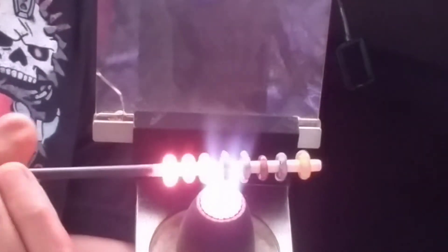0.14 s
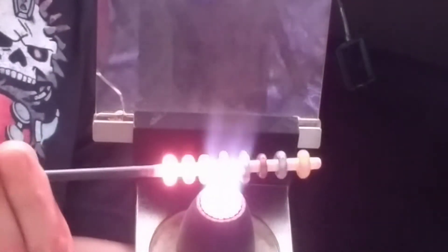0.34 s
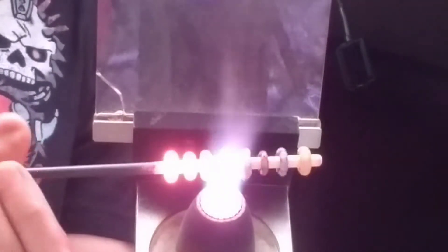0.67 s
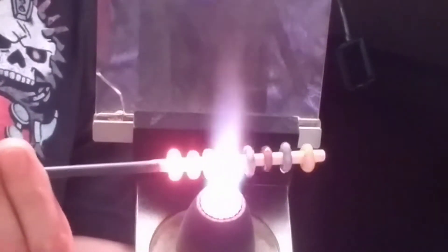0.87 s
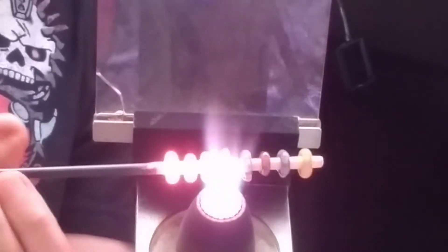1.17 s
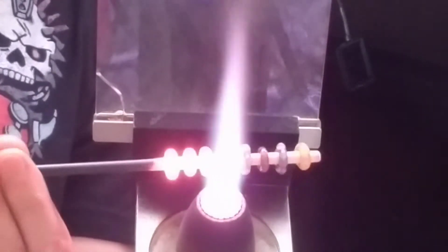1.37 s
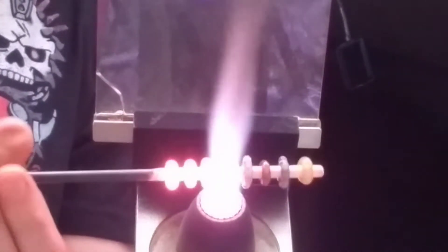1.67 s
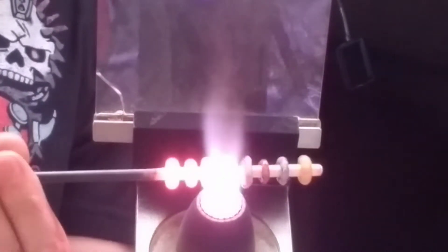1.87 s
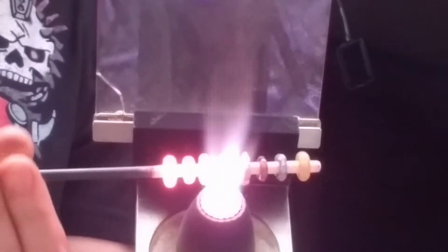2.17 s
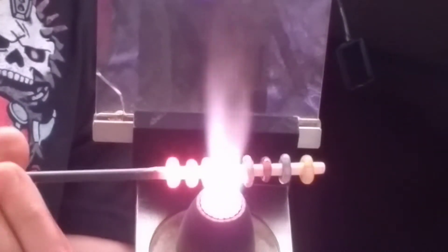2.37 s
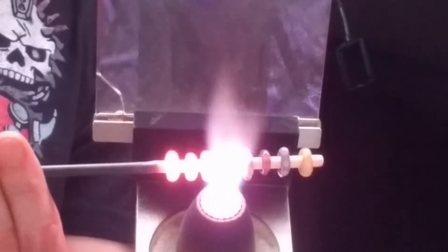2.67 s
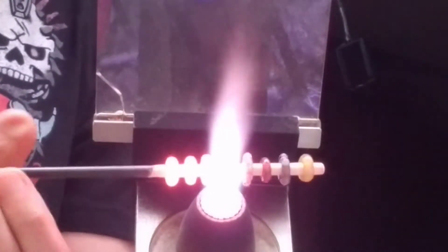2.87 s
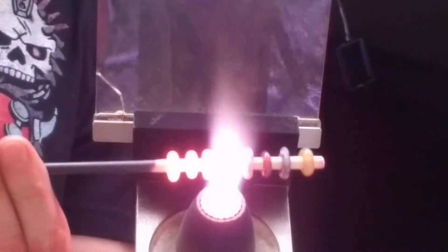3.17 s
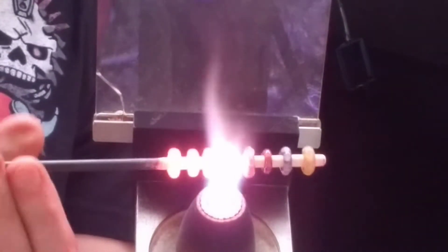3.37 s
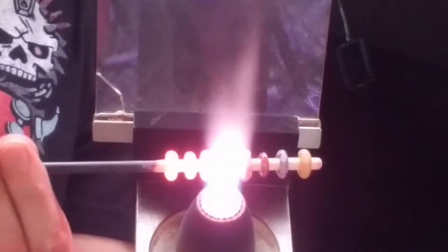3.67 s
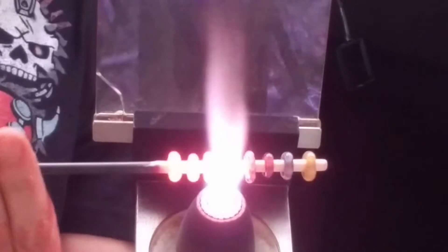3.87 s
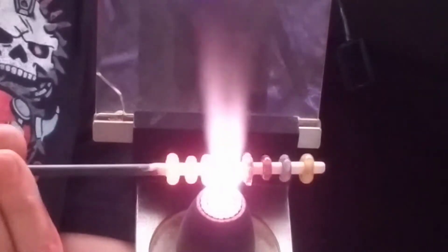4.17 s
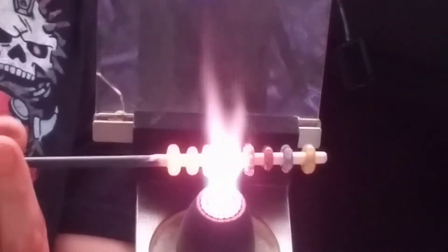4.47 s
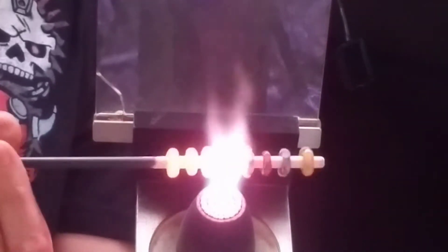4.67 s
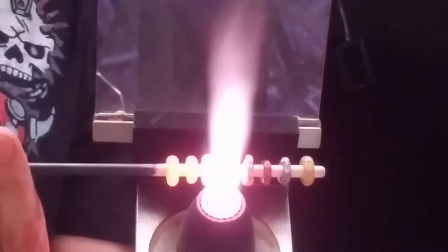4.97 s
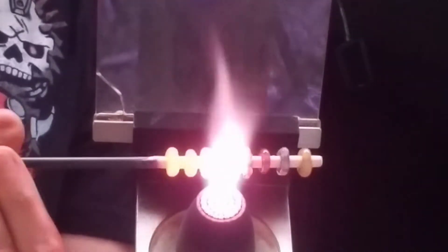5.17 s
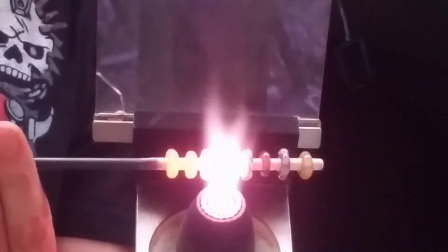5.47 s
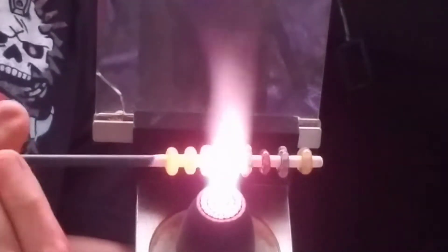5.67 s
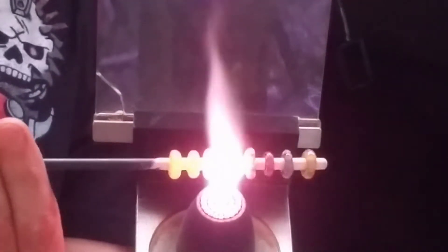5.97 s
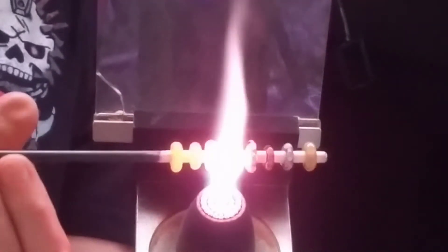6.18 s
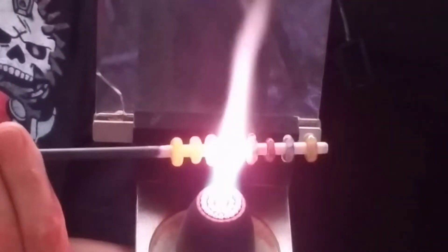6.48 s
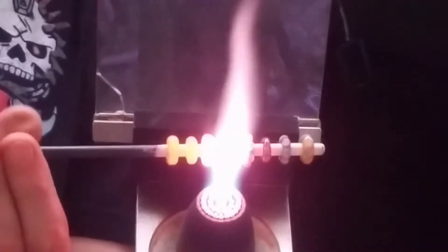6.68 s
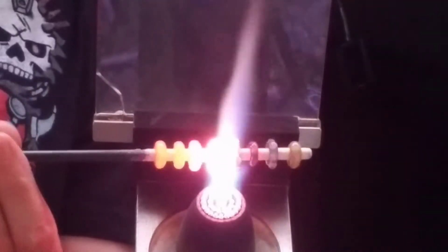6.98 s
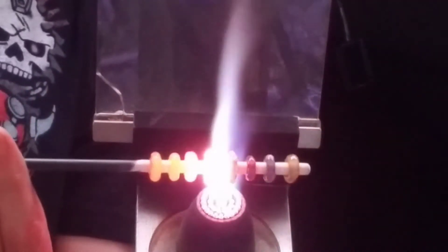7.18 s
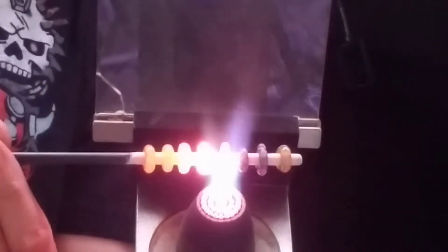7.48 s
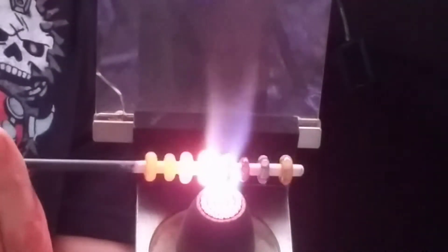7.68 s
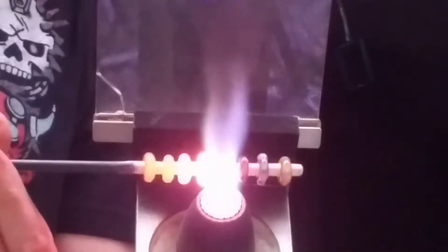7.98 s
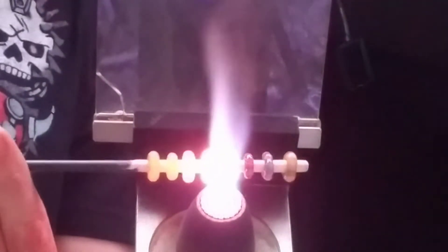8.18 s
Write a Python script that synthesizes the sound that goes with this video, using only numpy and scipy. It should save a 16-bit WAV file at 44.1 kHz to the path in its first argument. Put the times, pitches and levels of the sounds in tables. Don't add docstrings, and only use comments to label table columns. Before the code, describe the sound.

Throughout about 8.3 seconds, a gas torch on a workshop bench burns with a low, steady rush, blended with air moving through an extractor duct. Beneath it the fan and motor hold a deep hum, strongest near 147 Hz, wavering only slightly. A thin, fluttering jet hiss sits very high, around 13 to 15 kHz; it is briefly stronger at the very start, then settles, and surges a little at 5.2 seconds before easing by 5.5. A belt chirps about every 0.6 seconds, from 0.28 to 8.07: short, upward-gliding squeaks near 1.9 kHz with a quick echo, clearest at 0.3, 2.1, 2.7 and 8.1, weak around 1.5, 4.5 and 7.5. Fainter, higher metallic ticks accompany some. Close small microphone, faint electronic hiss; one side carries nearly everything, the other a dull, quiet copy.

```python
import sys
import numpy as np
from scipy import signal
from scipy.fft import rfft, irfft
from scipy.io import wavfile
from scipy.ndimage import uniform_filter1d

SR = 44100
rng = np.random.default_rng(int(sys.argv[2]) if len(sys.argv) > 2 else 0)


def voltage_ratio(decibels):
    exponent = np.asarray(decibels, float) / 20
    return 10 ** exponent


def bounce(signal):
    frames = np.transpose(np.atleast_2d(signal))
    limited = np.clip(frames, -1, 1)
    pcm = np.round(limited * 32767).astype(np.int16)
    wavfile.write(sys.argv[1], SR, pcm)


N = 367794


def read(points, hz, order=1):
    table = np.transpose(points)
    return np.interp(np.log(hz + 1), np.log(table[0] + 1), table[order])


def humps(modes, hz):
    return sum(voltage_ratio(db) ** 2 / (1 + (2 * (hz - f) / width) ** 2) ** 2 for f, width, db in modes)


def drift(shape, frames, bins):
    z = rng.standard_normal(shape)
    for _ in range(2):
        z = uniform_filter1d(z, max(int(frames), 1), -1)
        z = uniform_filter1d(z, max(int(bins), 1), 0)
    return z / z.std()


def noise(power, size, level_db=None, patchy_db=0., frames=8, bins=8, flicker_db=0.):
    overlap = size * 3 // 4
    hz, t, z = signal.stft(rng.standard_normal(N), SR, nperseg=size, noverlap=overlap)
    field_db = patchy_db * drift(z.shape, frames, bins)
    field_db = field_db + flicker_db * drift((1, len(t)), frames, 1)
    if level_db is not None:
        field_db = field_db + np.interp(t, *level_db)
    z = z * np.sqrt(power(hz) * SR / 2)[:, None] * voltage_ratio(field_db)
    return signal.istft(z, SR, nperseg=size, noverlap=overlap)[1][:N]


# f/Hz, level/dB rms, level wander/dB
HUM_TONES = [(58.1, -48, 0), (97.15, -41, 1), (119.9, -41, 2.5), (146.93, -32, 0.45), (296, -57.5, -1.5),
             (720, -66.5, 3)]


def hum():
    step = 441
    slow = drift((2 * len(HUM_TONES), N // step + 2), 25, 1)
    knots = step * np.arange(slow.shape[1])
    n, out = np.arange(N), np.zeros(N)
    for k, (hz, db, wander_db) in enumerate(HUM_TONES):
        level = np.interp(n, knots, slow[2 * k])
        sway = np.interp(n, knots, slow[2 * k + 1])
        turns = np.cumsum(hz * (1 + 0.001075 * sway)) / SR
        out += np.sqrt(2) * voltage_ratio(db + wander_db * level) * np.sin(2 * np.pi * turns)
    return out


def ring(slips, hz, width_hz, rise_s, t60_s, db):
    t = np.arange(len(slips)) / SR
    edges_hz = [hz - width_hz / 2, hz + width_hz / 2]
    band = signal.butter(2, edges_hz, "band", fs=SR, output="sos")
    burst = slips * (1 - np.exp(-t / rise_s)) * voltage_ratio(db - 60 * t / t60_s)
    return signal.sosfilt(band, burst) / np.sqrt(2 * width_hz / SR)


# f/Hz, level/dB, t60/s
GUARD_MODES = [(1884, 1, 0.097), (1953, -3.5, 0.078), (1745, -4.5, 0.07)]
# delay/s, level/dB
WALL_RETURNS = [(0.005, 3), (.02, -2.5), (.034, -3), (.056, -6), (.07, -11)]


def ping(t):
    rise_s, glide_hz_per_s = 0.0044, 1800
    out = np.zeros(len(t))
    for delay_s, wall_db in WALL_RETURNS:
        age = np.maximum(t - delay_s, 0)
        swell = 1 - np.exp(-age / rise_s)
        for hz, db, t60_s in GUARD_MODES:
            turns = (hz + glide_hz_per_s * age / 2) * age
            out += voltage_ratio(wall_db + db - 60 * age / t60_s) * swell * np.sin(2 * np.pi * turns)
    return out


# t/s, guard level/dB, pulley level/dB, bracket level/dB
SEAM_KNOCKS = [(.279, -53, -81, -90), (.879, -63.5, -80, -76), (1.478, -69, -83, -77),
               (2.078, -51.5, -73, -71.5), (2.679, -52, -65.5, -70), (3.280, -62, -62.5, -68),
               (3.879, -63, -73, -77), (4.478, -69, -66, -74), (5.068, -56.5, -71, -71),
               (5.674, -58, -61.5, -65.5), (6.272, -57.5, -75, -79), (6.872, -56.5, -79, -77),
               (7.47, -71, -73, -85), (8.067, -52.5, -75, -79)]
# f/Hz, width/Hz, rise/s, t60/s, level/dB
HOUSING_RINGS = [
    [(1920, 400, .012, .3, -6.5)],
    [(2936, 130, .001, 0.27, -3), (3140, 140, 0.00097, .2, -3), (3180, 140, 0.0045, 0.29, -7.5),
     (3590, 150, 0.001, 0.16, -8.5)],
    [(4500, 160, .0007, 0.11, -3.5), (4260, 230, .015, 0.24, 0.5), (4730, 200, .001, 0.099, -6)],
]


def belt():
    size = 12000
    out = np.zeros(N + size)
    walls, guard = rng.standard_normal(size), ping(np.arange(size) / SR)
    for s, *parts_db in SEAM_KNOCKS:
        slips = 0.93 * walls + 1.4 * rng.standard_normal(size)
        slips[70] += 32
        chirp = voltage_ratio(parts_db[0] + 3.5) * guard
        for part, db in zip(HOUSING_RINGS, parts_db):
            for mode in part:
                chirp = chirp + voltage_ratio(db) * ring(slips, *mode)
        start = round(s * SR)
        out[start:][:size] += chirp
    return out[:N]


# t/s, level/dB
GAS_FLOW = [
    (0.0, -56),
    (0.02, -65.5),
    (1.28, -64.5),
    (3.44, -66),
    (3.53, -65),
    (5.13, -65.5),
    (5.2, -62),
    (5.5, -64.5),
    (8.29, -66.5),
    (8.34, -66),
]


def flow_swing(share):
    s, flow_db = np.transpose(GAS_FLOW)
    return s, share * (flow_db - flow_db.mean())


# f/Hz, level/dB per Hz
RUSH_SPECTRUM = [(20, -75.5), (45, -65), (80, -56.5), (130, -56), (250, -58), (300, -68.5), (345, -74),
                 (600, -80.5), (1100, -85), (1600, -93), (2500, -100), (4700, -110), (5300, -117),
                 (9000, -130)]
# f/Hz, width/Hz, level/dB per Hz
DUCT_MODES = [(190.4, 14, -52.5), (243.6, 23.7, -55.5), (413, 18, -71), (442, 38, -65),
              (486.6, 15.3, -64.5), (530, 38, -73), (289.7, 7.5, -58), (333, 5.6, -76.5), (573, 22, -79),
              (625, 25, -82), (748, 36, -79), (819.5, 22, -75.5), (882, 50, -80), (1090, 120, -102.5),
              (1404, 80, -89), (1990, 370, -95.5), (2930, 540, -102), (4440, 320, -107), (5700, 22, -105),
              (4770, 40, -109), (7130, 220, -111)]


def rush():
    def power(hz):
        return voltage_ratio(read(RUSH_SPECTRUM, hz)) ** 2 + humps(DUCT_MODES, hz)
    return noise(power, size=4096, level_db=flow_swing(0.28), patchy_db=0.73, frames=5, bins=34.5,
                 flicker_db=0.2)


# f/Hz, width/Hz, level/dB per Hz
JET_BANDS = [(11500, 360, -111), (12010, 260, -102), (12500, 300, -101), (12900, 300, -105),
             (13170, 120, -89.5), (13500, 120, -86.5), (13650, 150, -86.5), (13760, 200, -91),
             (14230, 450, -92.5), (14500, 77, -89), (14770, 90, -91), (14800, 92, -88), (14600, 82, -83.5),
             (15350, 280, -91.5)]


def jets():
    def power(hz):
        return humps(JET_BANDS, hz)
    return noise(power, size=1024, level_db=flow_swing(0.9), patchy_db=1.6, frames=10, bins=5.7,
                 flicker_db=-1.0)


# f/Hz, leak level/dB, lag/rad
PORT_LEAK = [(30, -26.5, .5), (80, -25, -0.35), (148, -17, 0.85), (250, -17, -0.23), (370, -19.5, -0.098),
             (440, -28, -0.74), (490, -17, -0.8), (700, -18.5, -0.75), (1200, -29, 0.42),
             (2500, -38.5, 0.1), (9000, -43.5, 0.1)]


def scene():
    hz = np.fft.rfftfreq(N, 1 / SR)
    ripple, scatter = drift((2, len(hz)), 130, 1)
    ripple_db = 1.1 * np.clip(hz / 1500, 0, 1) ** 2 * ripple
    shop = rfft(rush() + jets() + belt()) * voltage_ratio(ripple_db) + rfft(hum())
    above = np.clip(hz / 600, 0, 1) ** 3
    lag_rad = read(PORT_LEAK, hz, order=2) + 1.68 * above * scatter
    leak = voltage_ratio(read(PORT_LEAK, hz)) * np.exp(1j * lag_rad)
    return irfft([shop, shop * leak], N)


# f/Hz, level/dB per Hz
SELF_NOISE = [(30, -102), (300, -94.5), (1000, -100), (2500, -104), (5000, -109.5), (6300, -113),
              (8000, -115.5), (10600, -119), (15500, -111)]


def capsule_hiss():
    def power(hz):
        return voltage_ratio(read(SELF_NOISE, hz)) ** 2
    return noise(power, size=1024, patchy_db=1.6, frames=5, bins=5.3)


def roll_off(x):
    return signal.sosfilt(signal.butter(12, 15515, fs=SR, output="sos"), x)


def record(dry):
    hiss = np.array([capsule_hiss() for _ in dry])
    mix = dry + hiss - 0.0006
    return roll_off(mix)


dry = scene()
out = record(dry)
bounce(out)
```